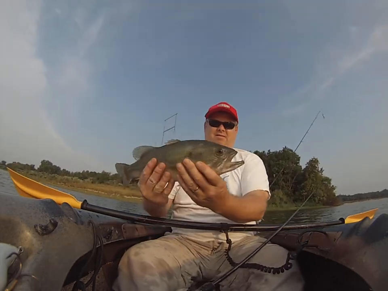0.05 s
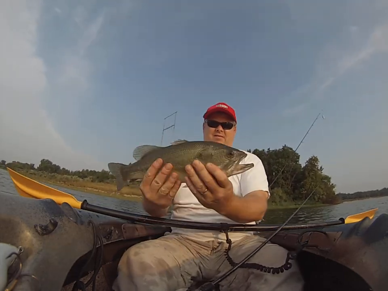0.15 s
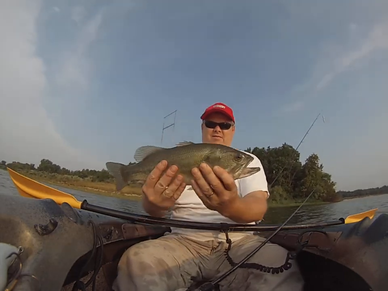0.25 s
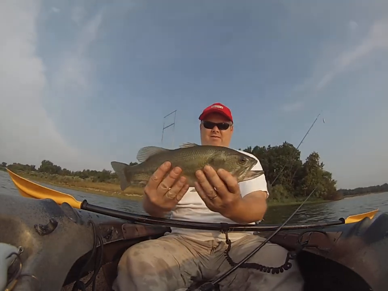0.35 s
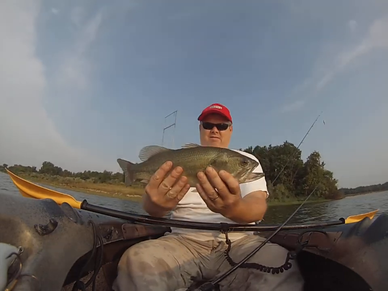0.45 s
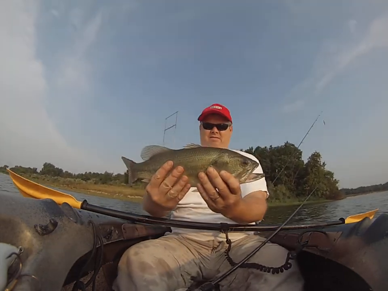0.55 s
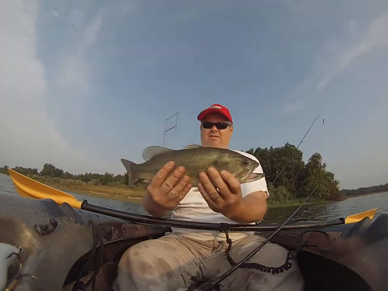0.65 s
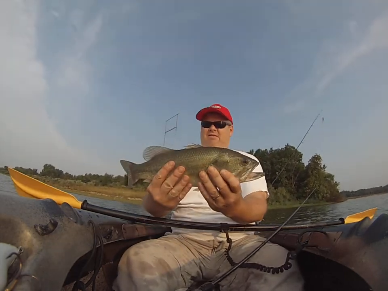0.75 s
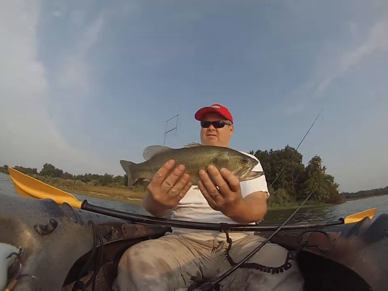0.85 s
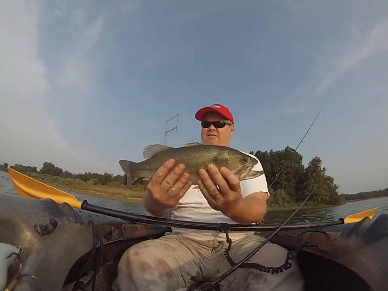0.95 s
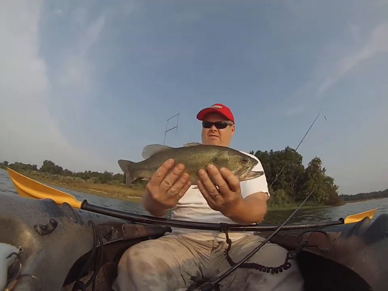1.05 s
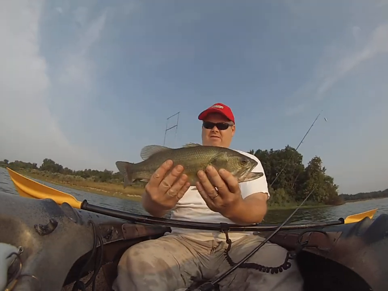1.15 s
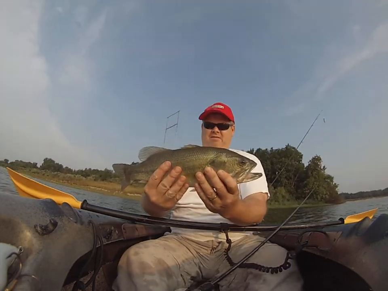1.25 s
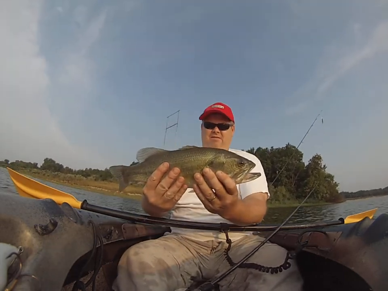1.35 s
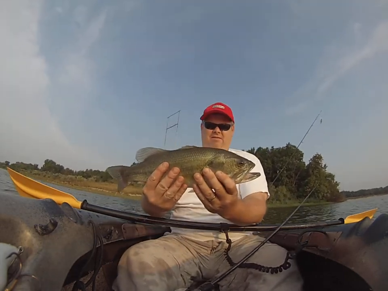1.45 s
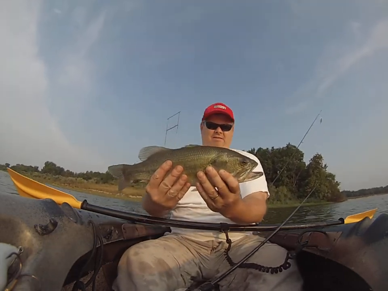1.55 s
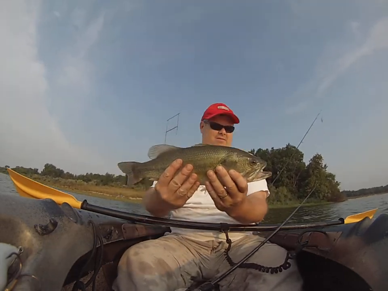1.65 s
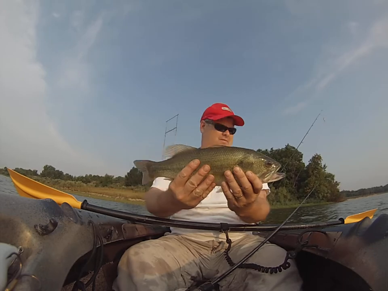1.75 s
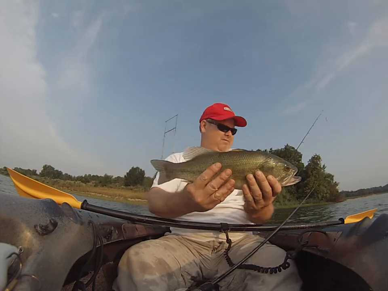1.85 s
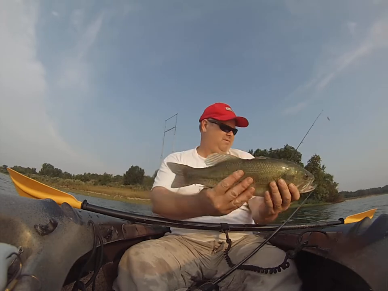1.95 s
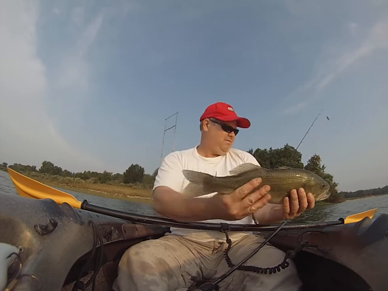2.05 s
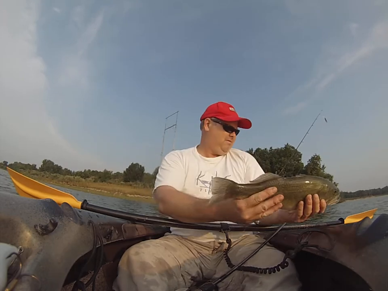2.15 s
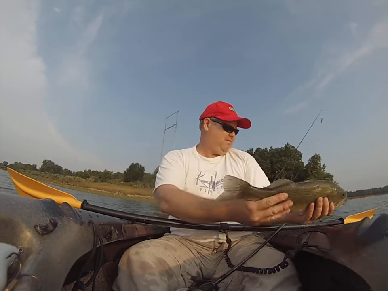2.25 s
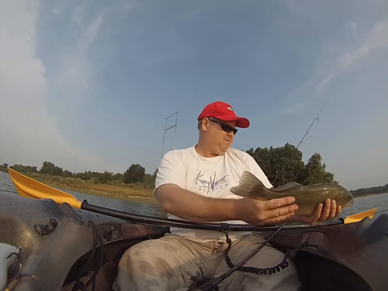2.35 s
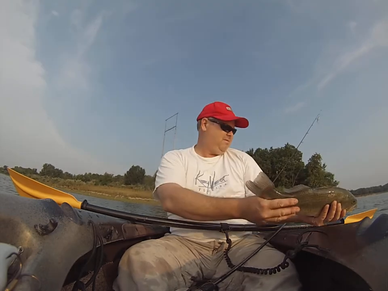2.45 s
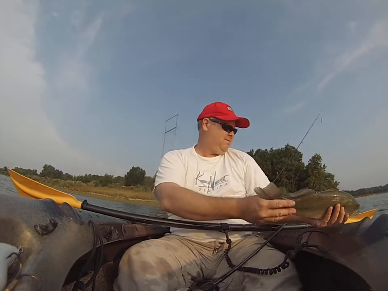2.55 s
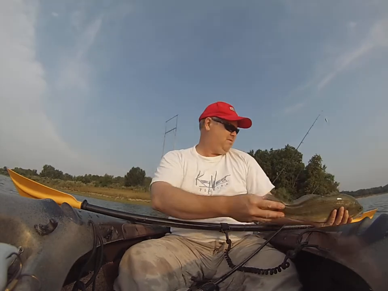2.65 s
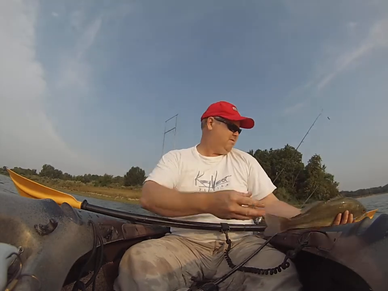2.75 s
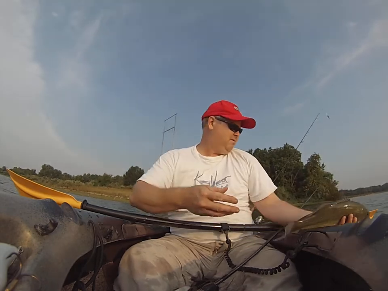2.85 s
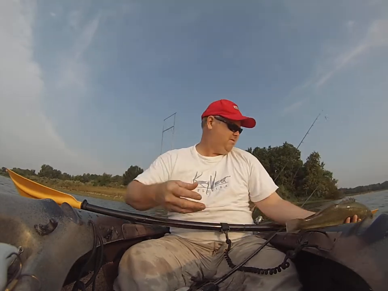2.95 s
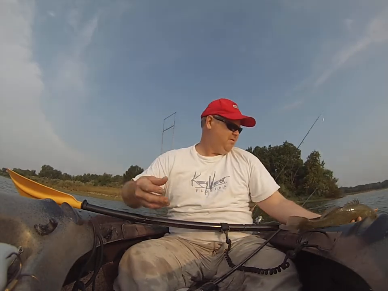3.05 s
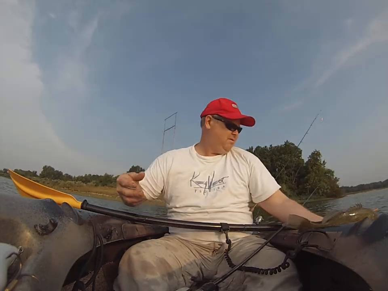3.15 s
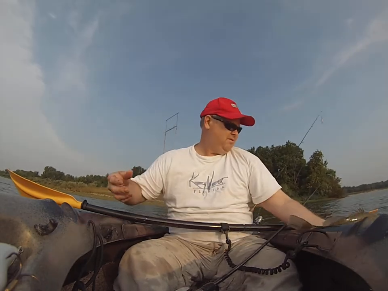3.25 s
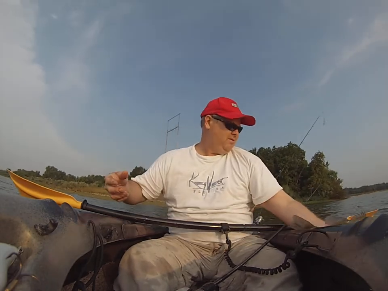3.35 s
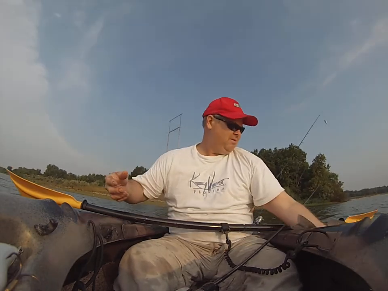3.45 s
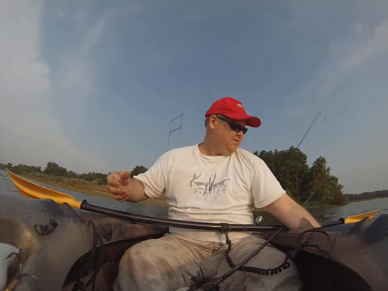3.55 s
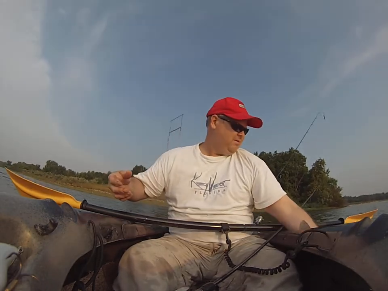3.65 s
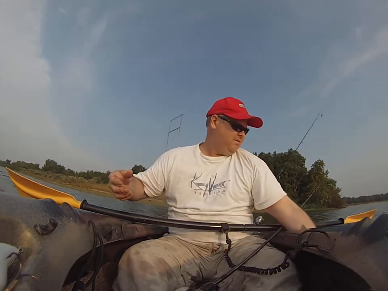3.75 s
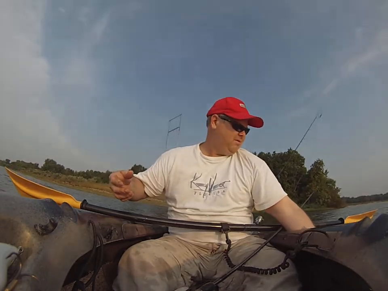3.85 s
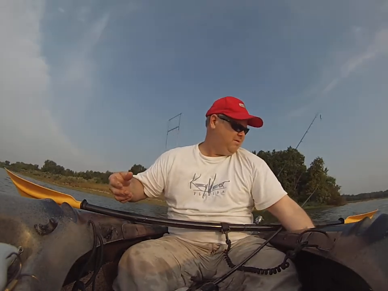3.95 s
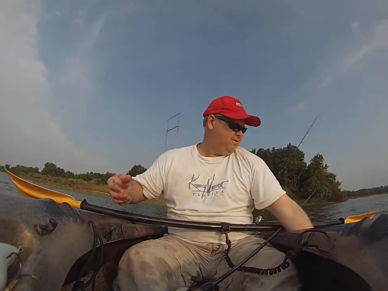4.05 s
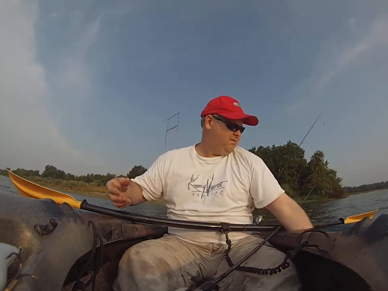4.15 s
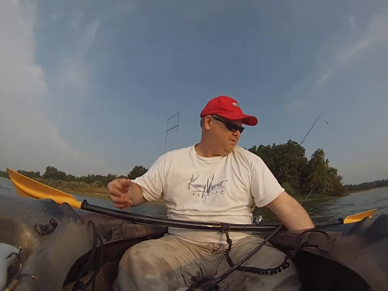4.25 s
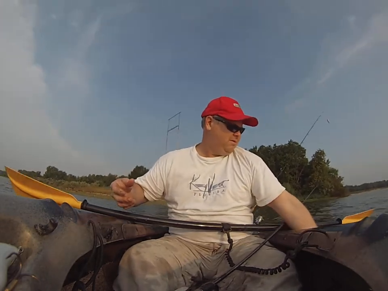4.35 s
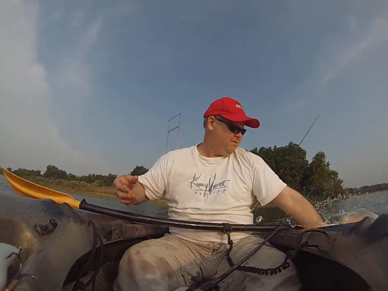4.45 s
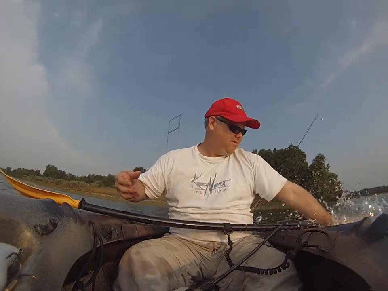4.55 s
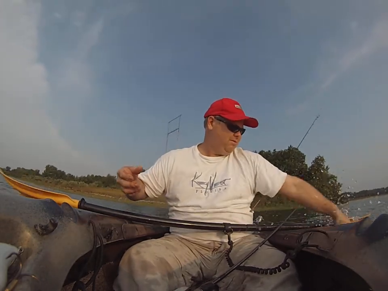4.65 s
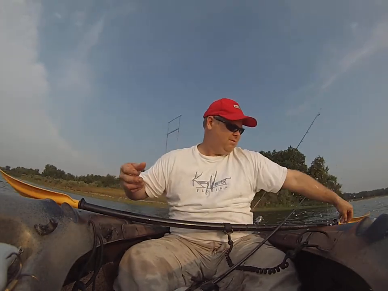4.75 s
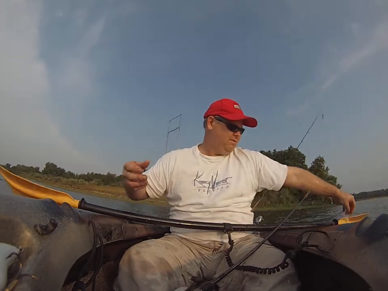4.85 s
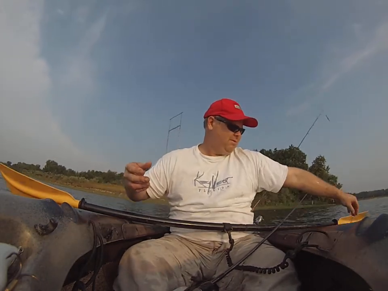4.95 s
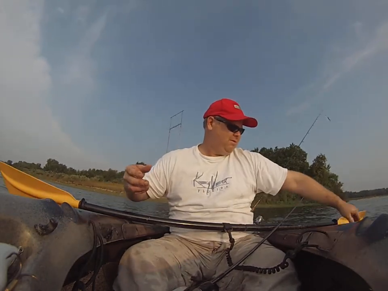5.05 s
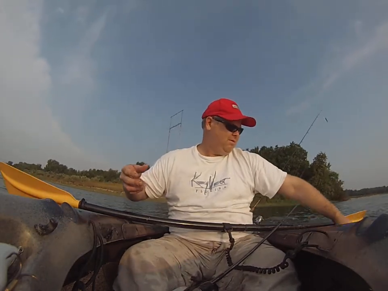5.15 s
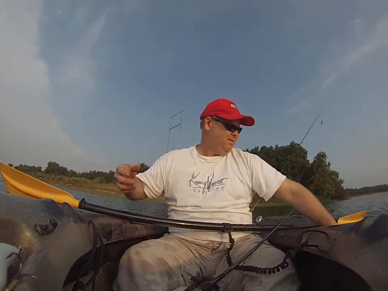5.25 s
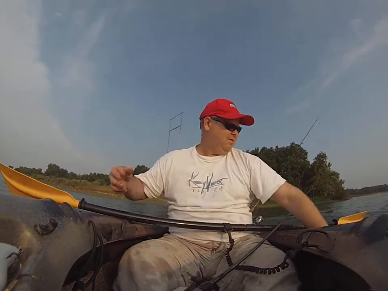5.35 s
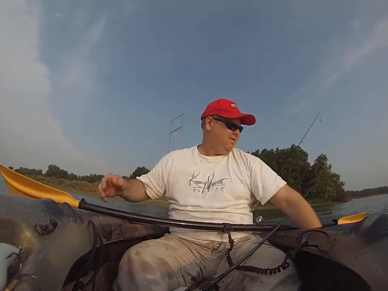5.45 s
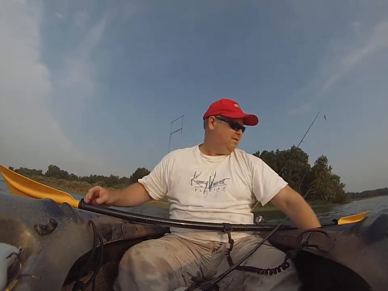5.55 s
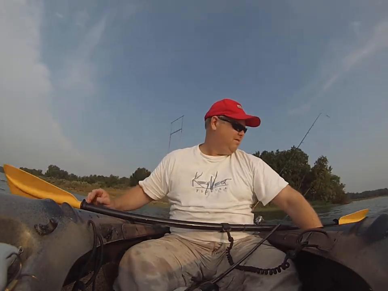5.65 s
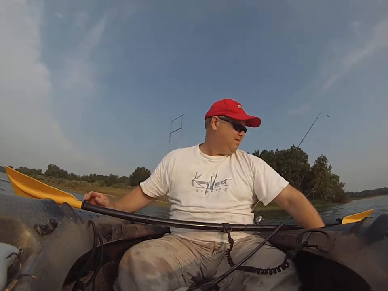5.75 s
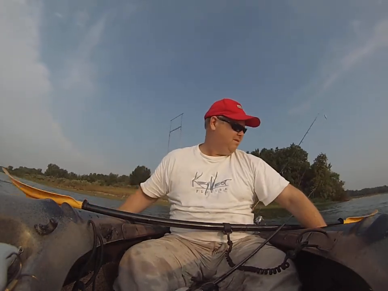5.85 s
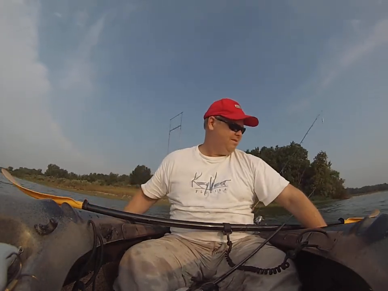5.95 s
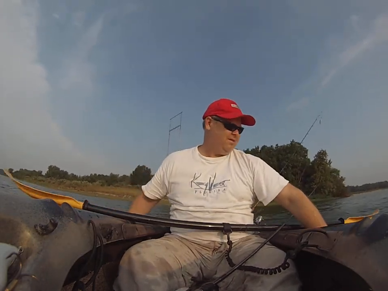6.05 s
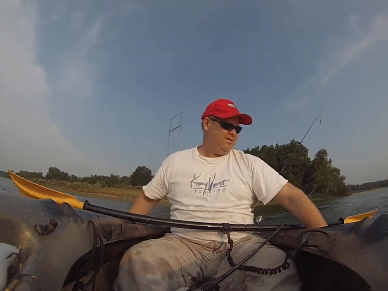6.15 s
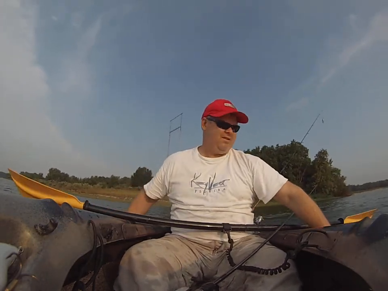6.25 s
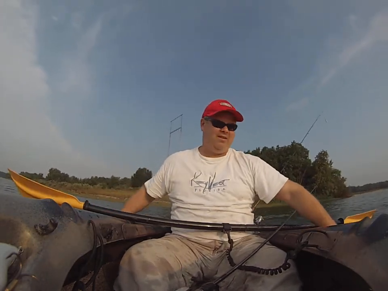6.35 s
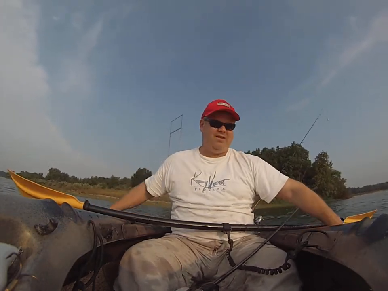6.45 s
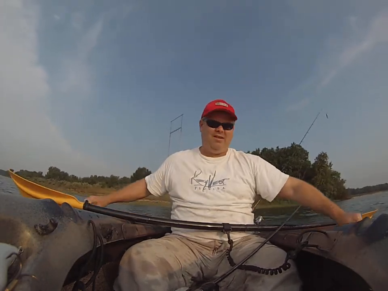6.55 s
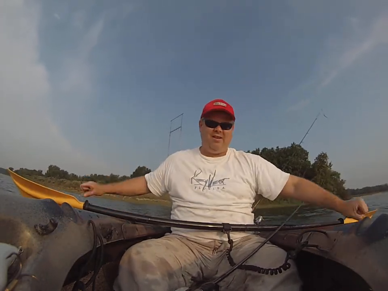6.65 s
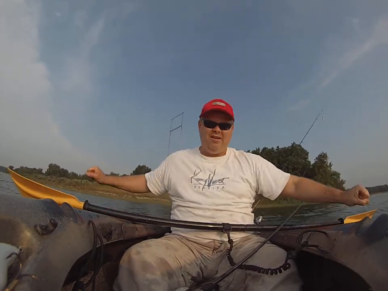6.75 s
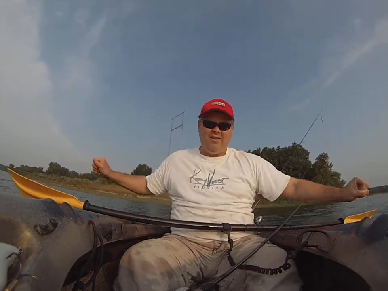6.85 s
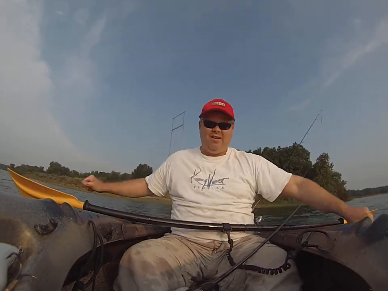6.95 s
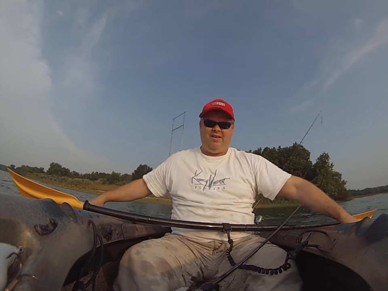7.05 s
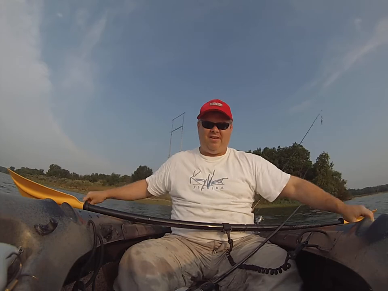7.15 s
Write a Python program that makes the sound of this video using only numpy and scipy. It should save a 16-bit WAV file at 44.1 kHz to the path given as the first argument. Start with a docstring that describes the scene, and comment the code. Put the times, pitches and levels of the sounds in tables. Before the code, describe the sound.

Outdoors on calm water, mono and muffled, with a steady soft hiss. Low hull heave and small wavelets run underneath. Isolated hollow bumps come first, then a sudden splash with sharp plasticky ticks and bubbly spray, sloshing for about half a second. Soon after, the boat rocks with a bunch of dull thuds and light plops, fading to faint laps.

```python
"""A fish let go by an angler in a plastic kayak kicks away with a splash: showers of clicks and air bubbles.
Slaps are noise clusters; thumps are short dents ringing the hull; ticks are cracks and damped rings.
The angler then rinses his hands and the boat rocks. A closed camera case on the deck rings and dulls the water.
Underneath, filtered clicks heave and lap at the hull; noise and gated sines make the camera hiss and whine."""
import sys
import numpy as np
from scipy import signal
from scipy.fft import rfft, irfft
from scipy.io import wavfile
from scipy.ndimage import uniform_filter1d

SR = 44100
rng = np.random.default_rng(int(sys.argv[2]) if len(sys.argv) > 2 else 0)


def transcribe(signal):
    """Save signal, clipped to [-1, 1], as a 16-bit WAV file at the path in sys.argv[1]."""
    frames = np.atleast_2d(signal).T
    limited = np.clip(frames, -1, 1)
    pcm = np.round(limited * 32767).astype(np.int16)
    wavfile.write(sys.argv[1], SR, pcm)


N = 317147
TIME = np.arange(N) / SR
RING_TIME = TIME[:SR]
LN_60_DB = np.log(1000)


# Water thrown up and raining back, levels before trim: (peak_s, drops_db, fine_spray_db, rise_s, fall_s)
SPLASHES = [(4.145, -54.5, -82, 0.017, 0.13), (4.385, -41.5, -80, 0.12, .04), (4.555, -31, -54, 0.13, .16),
            (4.73, -38, -58.5, 0.094, .14), (4.84, -37, -59.5, 0.067, .2), (4.95, -36.5, -72, 0.15, .04),
            (5.08, -56, -76, 0.042, .35), (5.68, -50, -80, 0.22, .1), (5.74, -45, -78, 0.045, .09),
            (5.825, -47, -72, 0.02, .13), (6.27, -57.5, -84, 0.18, .25)]
# Modes of the camera case: (mode_hz, relative_db, t60_s)
CASE_MODES = [(326, -14, 0.054), (366, -21, 0.069), (456, -8.5, 0.06), (586, 1.5, 0.013), (653, -9, 0.034),
              (828, -8, 0.027), (1060, -2.5, 0.034), (1302, 1, 0.022), (1408, 0, 0.026), (1523, -4, 0.026),
              (1967, -3.5, 0.013), (2112, 0, 0.015), (2257, -6, 0.0065), (2500, -15.5, 0.0095),
              (2610, -17, 0.0092), (3290, -24, .02), (4050, -31, 0.033)]
# Spectrum of fine spray: (freq_hz, relative_db)
SPRAY_SPECTRUM = [(300, 14), (1500, -14.5), (2600, 7.5), (3200, -6.5), (4300, -5), (5500, -16), (7000, -15),
                  (9000, -27), (14000, -40.5)]


def splashes():
    """A dense shower of drops and trapped bubbles rings the camera case; a little fine spray gets past it."""
    drops_gain = surges([(s, db, rise_s, fall_s) for s, db, _, rise_s, fall_s in SPLASHES])
    spray_gain = surges([(s, db, rise_s, fall_s) for s, _, db, rise_s, fall_s in SPLASHES])
    impacts = rms_one(grains(per_s=2600, spread_db=3.6) * from_db(1.8 * drift(110)))
    air = bubbles(per_s=180, low_hz=702, high_hz=3220, cycles=57, rise=0.034)
    water = through(impacts + from_db(-8) * air, ringing(CASE_MODES, spread_db=0))
    fizz = through(impacts, colour(SPRAY_SPECTRUM))
    drops = from_db(-5) * drops_gain * water / local_rms(water, 0.028)
    spray = from_db(5) * spray_gain * fizz / local_rms(fizz, 0.06)
    return drops + spray


def bubbles(per_s, low_hz, high_hz, cycles, rise):
    """Trapped air rings briefly, rising in pitch as it nears the surface."""
    out = np.zeros(N)
    t = TIME[:SR // 20]
    for when, smallness, faintness in rng.random((int(per_s * N / SR), 3)):
        hz = low_hz * (high_hz / low_hz) ** smallness
        age = hz * t / cycles  # 1 = 60 dB down
        tone = np.sin(2 * np.pi * hz * t * (1 + rise * age))
        add(out, when * (N - 2) / SR, tone * np.exp(-LN_60_DB * age), -18 * faintness)
    return rms_one(out)


# Slaps and plops of water, and the ringing tail of one knock, levels before trim:
# (start_s, level_db, stressed_pitch_hz, t60_s)
SLAPS = [(2.229, -44, 1170, 0.09), (3.303, -57, 1020, .032), (3.74, -52.5, 1200, .04),
         (4.135, -48, 1070, 0.023), (4.338, -40, 1420, 0.039), (4.367, -38, 1310, 0.048),
         (4.392, -19.5, 1430, 0.079), (4.408, -22, 1060, 0.015), (4.519, -30.5, 1440, 0.017),
         (4.548, -22, 1350, 0.032), (4.594, -29.5, 1380, 0.041), (4.633, -32.5, 2130, 0.027),
         (4.67, -38.5, 1180, 0.067), (4.806, -29.5, 1000, 0.081), (4.826, -27, 1170, 0.069),
         (4.872, -27, 1170, .05), (4.944, -29, 990, 0.071), (5.082, -48, 1430, 0.094),
         (5.165, -50, 1260, 0.034), (5.817, -37, 1310, 0.036), (5.853, -41.5, 950, 0.031),
         (6.119, -45, 1060, 0.071), (6.169, -53, 1370, 0.034)]
# Spectrum of the deeper gulp: (freq_hz, relative_db)
GULP_SPECTRUM = [(200, -15.5), (260, 6.5), (330, -11.5), (450, -1), (680, -2), (900, -4), (1500, -17)]


def slaps():
    """Each slap is a dying cluster of small impacts, coloured by a pocket of trapped air, that rings the case."""
    out = np.zeros(N)
    spray = colour(SPRAY_SPECTRUM)
    gulp = colour(GULP_SPECTRUM)
    for s, db, hz, t60 in SLAPS:
        cluster = rng.standard_normal(SR) * np.exp(-LN_60_DB * RING_TIME / t60)
        pocket = pitched(cluster, hz, sharpness=4.8, rest_db=-5)
        plop = through(pocket, ringing(CASE_MODES, spread_db=1.65))
        add(out, s, plop + from_db(-25.5) * through(cluster, spray), db - 4.5)
        # a heavier mass of water gulps more in proportion
        add(out, s, through(cluster, gulp), 1.32 * db - 0.5)
    return out


# Dull blows on the hull, levels before trim: (time_s, level_db, push_pitch_hz, hull_ring_db)
THUMPS = [(2.23, -26, 122, 7.5), (2.842, -20, 179, 7.5), (2.871, -20.5, 32.3, -6), (3.304, -33, 193, 10.5),
          (3.909, -28.5, 56, -5), (4.158, -33, 173, 24), (4.391, -14, 254, -18), (4.404, -8, 126, -2),
          (4.419, -9.5, 71, -14), (4.517, -15, 53.4, -2.5), (4.948, -23, 134, 5.5),
          (5.557, -14.5, 92, -9.5), (5.577, -12.5, 137, 3.5), (5.594, -8.5, 84, -20),
          (5.63, -13.5, 77, 2.5), (5.707, -11.5, 81.7, -3.5), (5.736, -10.5, 55, -16),
          (5.818, -14.5, 64.6, 4.5), (5.841, -14.5, 127, 13)]
# Modes of the hull: (mode_hz, relative_db, t60_s)
HULL_MODES = [(32.7, 3.5, 0.66), (47.5, -3.5, 0.75), (59.7, 2, 0.28), (84.2, -4.5, 1), (123.56, 2, 0.35),
              (138.5, 1.5, 0.1), (179.7, -9, 0.13), (203.2, -5, 0.25), (219, 3.5, 0.057),
              (308, -23.5, 0.17), (380, -8, .2)]


def thumps():
    """A blow dents the shell, which springs back within a cycle or two and leaves the hull ringing."""
    out = np.zeros(N)
    # the soft plastic passes little above its low modes
    shell = signal.butter(8, 305, "low", fs=SR, output="sos")
    for s, db, hz, ring_db in THUMPS:
        cycles = hz * RING_TIME
        dent = np.sin(2 * np.pi * cycles) * cycles ** 2 * np.exp(-cycles / 0.36)
        ring = through(dent, ringing(HULL_MODES, spread_db=1.5))
        blow = dent + from_db(ring_db - 27) * ring
        add(out, s - 0.003, signal.sosfilt(shell, blow), db - 2)
    return out


# Hard knocks on the deck, levels before trim: (start_s, ring_db, contact_pitch_hz, crack_db, damping_time_constant_s)
TICKS = [(2.226, -36.5, 1280, -63, 0.0096), (2.841, -42.5, 1370, -69, 0.013),
         (3.914, -26, 1950, -51.5, 0.0095), (4.391, -22.5, 2050, -45.5, 0.009),
         (4.409, -19, 1150, -39.5, 0.0078), (4.424, -51, 1140, -46.5, 0.007),
         (4.537, -20.5, 1900, -42, 0.011), (4.557, -21.5, 1500, -63, 0.0087),
         (5.602, -42.5, 1310, -52, 0.007), (5.713, -49, 1450, -57, 0.007)]
# Spectrum of the crack: (freq_hz, relative_db)
CRACK_SPECTRUM = [(300, 1.5), (900, 20.5), (2000, 9), (4500, 3.5), (7000, -2.5), (8500, -16),
                  (10000, -14.5), (14000, -26)]


def ticks():
    """Hard contacts reach the case through its mount: a sharp crack and a quickly damped ring."""
    out = np.zeros(N)
    bright = colour(CRACK_SPECTRUM)
    for s, db, hz, crack_db, damping_s in TICKS:
        ring = ringing(CASE_MODES, spread_db=1) * np.exp(-RING_TIME / damping_s)
        add(out, s, pitched(ring, hz, sharpness=2.5, rest_db=-2), db - 7)
        burst = rng.standard_normal(SR) * np.exp(-RING_TIME / 0.0027)
        add(out, s, through(burst, bright), crack_db + 6)
    return out


# Shifts of weight by angler or fish: (peak_s, heave_db, rise_s, fall_s)
ROCKINGS = [(.2, -42, 0.75, 0.24), (.39, -42.5, 0.15, 0.48), (1.33, -48.5, 0.13, 0.087),
            (1.95, -46, 0.54, 0.6), (2.29, -33, 0.14, 0.51), (3.36, -37.5, 0.26, 0.24),
            (3.53, -41, 0.13, 0.28), (3.8, -38, 0.23, 0.61), (4.28, -30.5, 0.085, 0.34),
            (4.5, -21, 0.33, 0.37), (4.88, -23.5, 0.38, 0.24), (5.12, -41, .1, 0.44),
            (5.62, -20.5, .05, 0.51), (6.25, -36, 0.24, 0.47), (6.8, -52, .4, .8)]
# Wavelets breaking on the hull: (crest_s, lapping_db, length_s)
LAPS = [(0.208, -43.5, 0.1), (0.516, -52.5, 0.57), (0.876, -42, 0.14), (1.238, -43, 0.14),
        (2.06, -37.5, .15), (2.27, -37, 0.25), (2.787, -41, 0.13), (3.024, -46, 0.34), (3.504, -47.5, 0.38),
        (3.766, -41, 0.14), (4.175, -33, 0.2), (4.388, -19.5, .2), (4.556, -27, 0.36), (4.845, -30.5, 0.43),
        (5.1, -45.5, 0.17), (5.334, -43.5, 0.17), (5.637, -24, 0.13), (5.706, -28.5, 0.13),
        (5.847, -22.5, .19), (6.156, -39.5, 0.28), (6.247, -57, .25), (6.496, -43, 0.11), (6.73, -49, .1)]
# Spectra of heave and lapping: (freq_hz, relative_db)
HEAVE_SPECTRUM = [(12, -24.5), (25, -3.5), (40, 4), (60, 4), (85, -0.5), (105, -6), (140, -31.5)]
LAPPING_SPECTRUM = [(80, -22.5), (115, 0.5), (150, 0.5), (215, 1), (245, -12.5), (285, -22), (400, -24.5),
                    (700, -43)]
CALM_HEAVE_DB, CALM_LAP_DB = -51.5, -58
LAP_RISE_SHARE, LAP_FALL_SHARE = 0.42, 0.68  # of a wavelet's length


def swell():
    """The boat heaves after each shift of weight and settles, while wavelets swell and fade at its sides."""
    lap_rows = [(s, db, LAP_RISE_SHARE * length_s, LAP_FALL_SHARE * length_s) for s, db, length_s in LAPS]
    heave_gain = surges(ROCKINGS, calm_db=CALM_HEAVE_DB)
    lap_gain = surges(lap_rows, calm_db=CALM_LAP_DB)
    heave = heave_gain * hull_wash(HEAVE_SPECTRUM, per_s=300, ring_db=-28, even_s=0.04)
    lapping = lap_gain * hull_wash(LAPPING_SPECTRUM, per_s=400, ring_db=-19.5, even_s=0.06)
    return heave + lapping


def hull_wash(spectrum, per_s, ring_db, even_s):
    """Wavelets push on the shell, partly directly and partly through its modes; running rms evened to about 1."""
    pushes = grains(per_s, spread_db=4)
    ring = through(pushes, ringing(HULL_MODES, spread_db=0))
    wash = through(pushes + from_db(ring_db) * ring, colour(spectrum))
    return wash / local_rms(wash, even_s)


# Spectrum of the hiss: (freq_hz, relative_db)
HISS_SPECTRUM = [(150, 8), (300, -2.5), (600, -5.5), (1200, -9.5), (2800, -14), (5000, -19), (8000, -24.5),
                 (11000, -28.5), (13000, -33.5), (15000, -39)]
HISS_RMS_DB = -59.5
# Partials of the camera's whine: (pitch_hz, width_hz, level_db)
BUZZ = [(2735, 240, -67), (4190, 360, -71), (10700, 400, -83)]
CHATTER = [(5350, 260, -77.5), (7120, 450, -83), (10200, 410, -87)]
PIPS = [(2835, 90, -89), (5670, 130, -86), (11340, 140, -86)]
# Spells of whine: (start_s, end_s)
BUZZ_SPELLS = [(.15, .37), (1.69, 1.83), (6.22, 6.39)]
CHATTER_SPELLS = [(1.83, 3.62)]


def electronics():
    """Steady hiss with a faint rattling buzz, a spell of grainy chatter and thin, uneven pips."""
    hiss = from_db(HISS_RMS_DB) * rms_one(through(rng.standard_normal(N), colour(HISS_SPECTRUM)))
    trill = pulsing(per_s=44, uneven=0.15, duty=0.8)
    buzz = whine(BUZZ, during(BUZZ_SPELLS) * trill)
    bursts = during(CHATTER_SPELLS) * pulsing(per_s=11, uneven=0.54, duty=0.45)
    chatter = whine(CHATTER, bursts * pulsing(per_s=115, uneven=0.09, duty=0.45))
    pips = whine(PIPS, pulsing(per_s=13, uneven=0.46, duty=0.21))
    return hiss + buzz + chatter + pips


def whine(partials, gate):
    """Sines of wandering pitch form thin bands that sound while the gate is open."""
    out = 0
    for hz, width_hz, db in partials:
        wander_cycles = np.cumsum(drift(2.2 * width_hz)) * 0.56 * width_hz / SR
        tone = np.sin(2 * np.pi * (hz * TIME + wander_cycles))
        out = out + from_db(db) * np.sqrt(2) * tone
    return out * uniform_filter1d(gate, size=130)  # softened edges


def during(spells):
    """1 inside the spells, 0 outside."""
    return sum(1.0 * (TIME > start_s) * (TIME < end_s) for start_s, end_s in spells)


def pulsing(per_s, uneven, duty):
    """On for a share of each cycle, at a loosely held rate; rms 1."""
    cycles = per_s * np.cumsum(1 + uneven * drift(per_s)) / SR
    return rms_one(1.0 * (cycles % 1 < duty))


def surges(rows, calm_db=-120):
    """Gain that climbs and sinks by 20 dB in rise_s and fall_s; powers sum over a calm level."""
    power = from_db(calm_db) ** 2
    for peak_s, db, rise_s, fall_s in rows:
        away = np.maximum((peak_s - TIME) / rise_s, (TIME - peak_s) / fall_s)
        power = power + from_db(db - 20 * np.minimum(away, 10)) ** 2
    return np.sqrt(power)


def grains(per_s, spread_db):
    """Random clicks of either sign, many small and a few large."""
    signs = rng.choice([-1, 1], N)
    sizes = from_db(spread_db * np.minimum(rng.exponential(1, N), 4))
    return signs * sizes * (rng.random(N) < per_s / SR)


def ringing(modes, spread_db):
    """Decaying sines of a struck body, energy 1; their strengths vary with the spot that is hit."""
    out = 0
    for k, (hz, db, t60) in enumerate(modes):
        strength = (-1) ** k * from_db(db + spread_db * rng.normal())
        decay = np.exp(-LN_60_DB * RING_TIME / t60)
        out = out + strength * np.sin(2 * np.pi * hz * RING_TIME) * decay
    return out / np.sqrt(np.sum(out ** 2))


def pitched(x, hz, sharpness, rest_db):
    """Resonance stresses one pitch; the rest passes more weakly."""
    return signal.lfilter(*signal.iirpeak(hz, sharpness, fs=SR), x) + from_db(rest_db) * x


def colour(points, size=8192):
    """Causal (minimum-phase) impulse response with the given spectrum."""
    hz, db = np.transpose(points)
    log_hz = np.log(np.fft.rfftfreq(size, 1 / SR) + 1)
    beyond = np.abs(log_hz - np.clip(log_hz, np.log(hz[0]), np.log(hz[-1])))
    target_db = np.interp(log_hz, np.log(hz), db) - 20 * beyond  # falls off outside the table
    cepstrum = irfft(np.log(from_db(target_db)))
    # fold onto positive time: minimum phase
    cepstrum[1:size // 2] *= 2
    cepstrum[size // 2 + 1:] = 0
    return irfft(np.exp(rfft(cepstrum)))


def through(x, response):
    """Pass a sound through an impulse response."""
    return signal.fftconvolve(x, response)[:len(x)]


def drift(rate_hz):
    """Smooth chance, rms 1: lines between random knots."""
    knots = rng.standard_normal(int(rate_hz * N / SR) + 2)
    return rms_one(np.interp(TIME * rate_hz, np.arange(len(knots)), knots))


def add(out, start_s, sound, level_db):
    """Mix in a short sound; level_db is its highest 3 ms rms."""
    start = int(start_s * SR)
    piece = sound[:N - start] / local_rms(sound, 0.003).max()
    out[start:start + len(piece)] += from_db(level_db) * piece


def from_db(db):
    """Decibels to gain."""
    return 10 ** (np.asarray(db) / 20)


def rms_one(x):
    """Scale to rms 1."""
    return x / np.sqrt(np.mean(x ** 2) + 1e-20)


def local_rms(x, window_s):
    """Running rms."""
    return np.sqrt(np.abs(uniform_filter1d(x ** 2, int(window_s * SR))) + 1e-14)


def scene():
    """Water, hull and camera in one channel."""
    water = splashes() + slaps()
    knocks = thumps() + ticks()
    return (water + knocks + swell() + electronics())[None]


CUTOFF_HZ = 14800


def record(dry):
    """The microphone loses the deepest bass; the top is cut steeply."""
    thinned = signal.sosfilt(signal.butter(2, 20, "high", fs=SR, output="sos"), dry)
    return signal.sosfilt(signal.ellip(10, 0.1, 80, CUTOFF_HZ, fs=SR, output="sos"), thinned)


dry = scene()
out = record(dry)
transcribe(out)
```